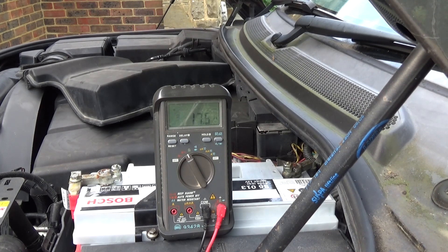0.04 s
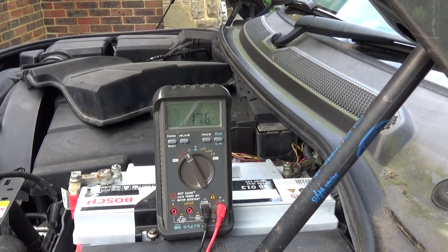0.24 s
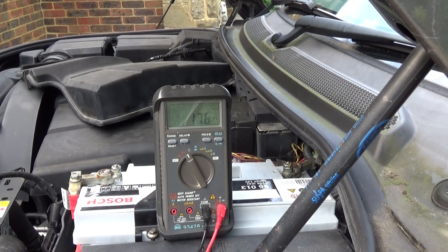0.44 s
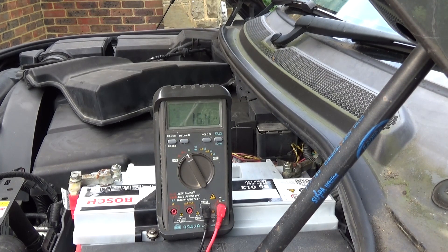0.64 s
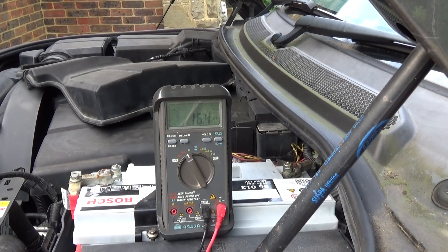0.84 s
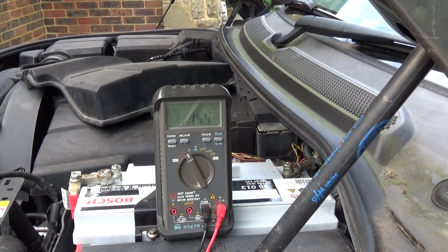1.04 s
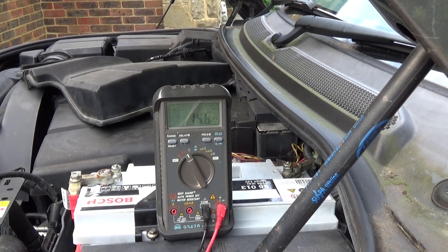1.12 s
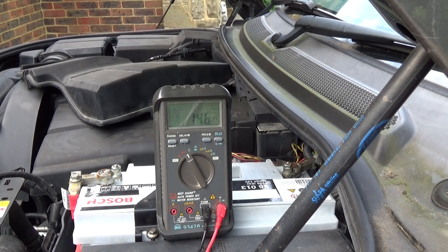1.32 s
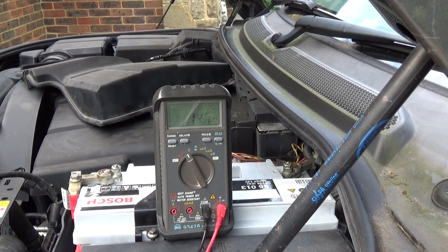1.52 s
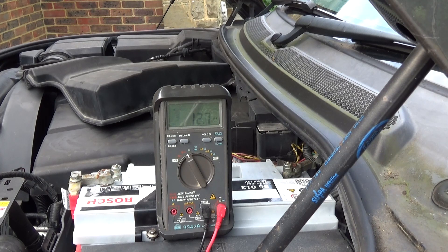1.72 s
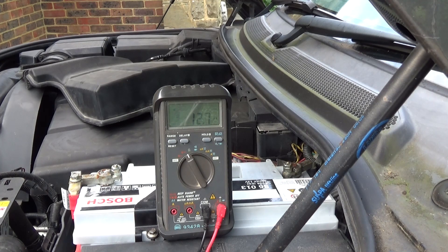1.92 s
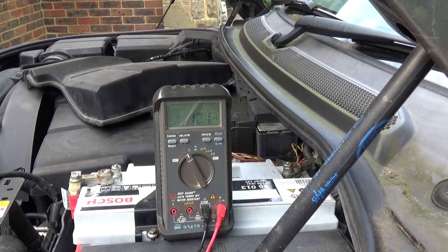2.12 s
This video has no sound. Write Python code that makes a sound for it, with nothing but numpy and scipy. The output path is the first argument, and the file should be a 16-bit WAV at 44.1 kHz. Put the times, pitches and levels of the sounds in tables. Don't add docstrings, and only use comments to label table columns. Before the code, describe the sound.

Close to an open engine bay in a quiet yard, a soft click starts a fast, bright, buzzing metal clatter from a failing starter; it cuts off sharply, leaving short reverberation, two groups of relay ticks and faint traffic hum.

```python
import sys
import numpy as np
from scipy import signal
from scipy.fft import rfft, irfft, next_fast_len
from scipy.io import wavfile
from scipy.ndimage import map_coordinates

SR = 44100
rng = np.random.default_rng(int(sys.argv[2]) if len(sys.argv) > 2 else 0)


def volts_from_db(level):
    exponent = np.asarray(level, float) / 20
    return 10 ** exponent


def master_out(mix):
    frames = np.transpose(np.atleast_2d(mix))
    ceiling = np.clip(frames, -1, 1)
    pcm = np.round(ceiling * 32767).astype(np.int16)
    wavfile.write(sys.argv[1], SR, pcm)


N = 94815


def unit(x):
    return x / np.sqrt(np.mean(x ** 2) + 1e-20)


def along(points, hz):
    point_hz, value = np.transpose(points)
    return np.interp(np.log(hz + 1), np.log(point_hz + 1), value)


def filtered(x, response):
    size = next_fast_len(N + SR // 2)
    hz = np.fft.rfftfreq(size, 1 / SR)
    return irfft(rfft(x, size) * response(hz), size)[..., :N]


def causal(gain):
    rms = np.sqrt(np.mean(gain ** 2))
    cepstrum = irfft(np.log(gain / rms + 1e-5))
    half = len(cepstrum) // 2
    cepstrum[1:half] *= 2
    cepstrum[half + 1:] = 0
    return np.exp(rfft(cepstrum))


def add(x, start_s, piece):
    part = x[..., max(round(start_s * SR), 0):][..., :piece.shape[-1]]
    part += piece[..., :part.shape[-1]]


def sine(hz, t):
    return np.sin(2 * np.pi * hz * t)


def swell_in(t, rise_s):
    return 1 - np.exp(-t / rise_s)


# pitch_hz, level_db
HUM = [(25, -20), (45, 0), (70, -11), (260, -6), (600, -12), (1400, -20), (3000, -29), (16000, -40)]


def hum():
    hum_db, swell_db, swell_hz = -48.5, 1.5, 14
    swell = map_coordinates(rng.standard_normal(40), [np.arange(N) * swell_hz / SR])
    noise = filtered(rng.standard_normal((2, N)), lambda hz: volts_from_db(along(HUM, hz)))
    return volts_from_db(hum_db + swell_db * swell) * unit(noise)


def space(x, decay, gap_s):
    hz, t, z = signal.stft(rng.standard_normal((2, SR // 2)), SR, nperseg=256)
    fade = volts_from_db(-60 * t / along(decay, hz)[:, None])
    tail = signal.istft(z * fade, SR, nperseg=256)[1]
    late = np.pad(x, (round(gap_s * SR), 0))[None]
    return signal.fftconvolve(late, tail / np.linalg.norm(tail[0]), axes=1)[:, :N]


# start_s, level_db, pitch_hz, rattle_s
RELAYS = [
    (.0835, -33, 2200, .005),
    (2.0405, -31, 3500, .003),
    (2.0600, -38, 10000, .003),
    (2.0620, -33, 2250, .002),
    (2.1228, -31, 3800, .005),
    (2.1245, -36, 1750, .004),
    (2.1310, -45, 10000, .007),
]
# pitch_hz, level_db
RELAY_BOX = [(400, -20), (1200, 0), (5000, -1), (7000, -9), (10000, 1), (13000, -3), (16000, -20)]
# start_s, pitch_hz, level_db, t60_s
KNOCKS = [
    (.040, 1400, -42, .07),
    (.044, 620, -45, .06),
    (2.046, 380, -37, .05),
    (2.128, 430, -28, .045),
    (2.133, 300, -34, .05),
]


def relays():
    width_share, broad_db, tail_t60_s = .17, -15, .018
    t, out = np.arange(SR // 20) / SR, np.zeros(N)
    for start_s, level_db, pitch_hz, rattle_s in RELAYS:
        tick, width_hz = np.zeros(N), width_share * pitch_hz
        fade_db = -60 * np.clip(t - rattle_s, 0, 1) / tail_t60_s - 4 * t / rattle_s
        add(tick, start_s, volts_from_db(level_db + fade_db) * rng.standard_normal(len(t)))

        def box(hz):
            peak = width_hz / np.hypot(width_hz, 2 * (hz - pitch_hz))
            return causal(volts_from_db(along(RELAY_BOX, hz)) * (volts_from_db(broad_db) + peak))

        out += filtered(tick, box)
    for start_s, pitch_hz, level_db, t60_s in KNOCKS:
        add(out, start_s, volts_from_db(level_db - 60 * t / t60_s) * sine(pitch_hz, t) * swell_in(t, .002))
    return out


# start_s, thud_db, panel_hz, clatter_db
SEATS = [(0.114, -34.0, 237, -20.9), (0.177, -38.2, 754, -20.2), (0.23, -32.2, 291, -17.5),
         (0.288, -30.2, 231, -19.8), (0.347, -32.3, 517, -21.3), (0.408, -33.4, 646, -20.8),
         (0.467, -29.4, 495, -21.2), (0.529, -30.4, 484, -19.0), (0.591, -33.1, 490, -19.1),
         (0.651, -35.5, 791, -20.3), (0.713, -33.3, 484, -20.9), (0.776, -31.8, 275, -21.4),
         (0.84, -33.0, 867, -20.5), (0.902, -35.3, 807, -20.8), (0.967, -32.8, 592, -18.8),
         (1.03, -32.0, 829, -18.3), (1.093, -33.1, 802, -20.8), (1.157, -32.8, 484, -20.1),
         (1.223, -34.3, 807, -18.4), (1.287, -34.6, 802, -19.7), (1.353, -34.1, 867, -18.6),
         (1.419, -33.6, 834, -15.0), (1.484, -33.3, 807, -17.4), (1.546, -34.0, 818, -19.0),
         (1.614, -33.1, 829, -18.7), (1.68, -33.6, 807, -18.6), (1.745, -33.0, 834, -18.0),
         (1.815, -35.1, 818, -18.2), (1.881, -35.7, 700, -17.6)]
# pitch_hz, level_db, t60_s
BLOCK = [(122, -36, .13), (155, -37, .11), (240, -43, .10), (495, -40, .1)]


def thud():
    follow, panel_db, panel_t60_s = .7, 3, .08
    t, x = np.arange(SR // 4) / SR, np.zeros(N)
    usual_db = np.mean(SEATS, axis=0)[1]
    for start_s, thud_db, panel_hz, _ in SEATS:
        ring = np.zeros(len(t))
        for (pitch_hz, level_db, t60_s), r in zip(BLOCK, rng.standard_normal(len(BLOCK))):
            ring += volts_from_db(level_db + 2.5 * r - 60 * t / t60_s) * sine(pitch_hz * (1 + .045 * r), t)
        add(x, start_s, volts_from_db(follow * (thud_db - usual_db)) * ring * swell_in(t, .004))
        panel = volts_from_db(thud_db + panel_db - 60 * t / panel_t60_s) * sine(panel_hz, t)
        add(x, start_s, panel * swell_in(t, .005))
    return x


# start_s, level_db, loudest_hz
BLOWS = [(0.107, -11.2, 3400.0), (0.1614, -13.6, 4950.0), (0.1663, -12.1, 12340.0), (0.2195, -11.9, 9800.0),
         (0.2419, -14.2, 2070.0), (0.2742, -12.5, 3570.0), (0.2788, -11.2, 3450.0), (0.2921, -14.8, 2150.0),
         (0.3953, -11.8, 3660.0), (0.5167, -12.1, 3680.0), (0.5779, -11.8, 3660.0), (0.638, -12.3, 9860.0),
         (0.6449, -12.8, 4460.0), (0.7009, -12.0, 3660.0), (0.7623, -12.2, 3600.0), (0.77, -12.7, 3620.0),
         (0.8276, -12.3, 3660.0), (0.8908, -12.4, 9800.0), (0.9533, -12.3, 3600.0), (1.0163, -13.5, 3620.0),
         (1.0323, -13.2, 3730.0), (1.0804, -12.0, 9820.0), (1.1448, -12.3, 3600.0), (1.1746, -15.9, 3700.0),
         (1.2072, -13.0, 4370.0), (1.2402, -15.4, 3770.0), (1.2738, -12.7, 3620.0), (1.3405, -11.5, 9820.0),
         (1.4044, -11.6, 3620.0), (1.4203, -10.0, 2090.0), (1.4694, -12.7, 9820.0), (1.4774, -12.9, 3640.0),
         (1.4843, -13.0, 2090.0), (1.5346, -12.1, 3600.0), (1.5419, -12.9, 3640.0), (1.5654, -15.2, 1720.0),
         (1.6003, -11.9, 9820.0), (1.6661, -12.3, 3620.0), (1.7323, -11.8, 3620.0), (1.7498, -13.6, 3620.0),
         (1.8013, -11.9, 3600.0), (1.8688, -10.9, 3640.0)]
# pitch_hz, level_db
TOOTH = [(3620, -7), (4400, -9), (8050, -13), (9820, -8)]


def blows():
    blow_db, ring_t60_s, crack_db, crack_t60_s, rise_s = -3.5, .021, -7, .012, .0006
    t, x = np.arange(SR // 20) / SR, np.zeros(N)
    for start_s, level_db, loudest_hz in BLOWS:
        ring = sine(loudest_hz, t)
        for (pitch_hz, mode_db), r in zip(TOOTH, rng.standard_normal(len(TOOTH))):
            phase = 2 * np.pi * (pitch_hz * (1 + .01 * r) * t + r)
            ring += volts_from_db(mode_db + 3 * r) * np.sin(phase)
        crack = volts_from_db(crack_db - 60 * t / crack_t60_s) * rng.standard_normal(len(t))
        blow = volts_from_db(-60 * t / ring_t60_s) * ring + crack
        add(x, start_s - rise_s, volts_from_db(level_db + blow_db) * blow * swell_in(t, rise_s))
    return filtered(x, lambda hz: causal(hz ** 2 / (hz ** 2 + 1200 ** 2)))


# pitch_hz, width_hz, lift_db
METAL_MODES = [(1022, 26, 9), (1207, 25, 4), (1630, 16, 10), (1806, 14, 8), (1969, 22, 5), (2010, 25, 5),
               (2121, 27, 8.5), (3330, 30, 5), (3620, 40, 6), (3735, 25, 4), (3813, 22, 6), (4200, 25, 6),
               (4369, 18, 7),
               (812, 24, 7), (4605, 27, 4), (4960, 30, 4), (8005, 120, 4), (9695, 90, 5), (12400, 120, 2.5)]


def metal(colour):
    def response(hz):
        power = 1
        for mode_hz, width_hz, lift_db in METAL_MODES:
            power = power + volts_from_db(2 * lift_db) * width_hz ** 2 / (width_hz ** 2 + 4 * (hz - mode_hz) ** 2)
        return causal(volts_from_db(along(colour, hz)) * np.sqrt(power))
    return response


def tinted(noise, spot_hz):
    patch_db, patch_hz, spot_db, spot_width_hz = 1.6, 700, 3.5, 1100
    hz = np.fft.rfftfreq(noise.shape[-1], 1 / SR)
    knots = rng.standard_normal((len(noise), int(SR / 2 / patch_hz) + 2))
    patch = np.array([np.interp(hz / patch_hz, np.arange(len(k)), k) for k in knots])
    spot = np.exp(-((hz - spot_hz[:, None]) / spot_width_hz) ** 2)
    gain = volts_from_db(patch_db * patch + spot_db * spot)
    return unit(irfft(rfft(noise) * gain[:, None], noise.shape[-1]))


# start_s, peak_db, clang_db, brightest_hz
STROKES = [(0.0985, -7, -20, 8100), (0.16, -7, -28, 12400), (0.2134, -6, -23, 9940),
           (0.2713, -7, -17, 7840), (0.3301, -7, -19, 12400), (0.3905, -6, -20, 8260),
           (0.4499, -6, -20, 7950), (0.5117, -7, -19, 12400), (0.5736, -6, -20, 9700),
           (0.6345, -5, -24, 9690), (0.6963, -6, -21, 9690), (0.7587, -5, -18, 8450),
           (0.823, -7, -18, 8140), (0.8846, -8, -23, 9700), (0.9497, -7, -21, 9690),
           (1.0126, -8, -23, 9690), (1.0765, -6, -22, 9860), (1.1403, -7, -21, 9700),
           (1.2062, -7, -21, 9690), (1.2705, -6, -21, 9860), (1.3359, -6, -23, 9910),
           (1.4017, -5, -20, 9860), (1.4666, -6, -22, 9690), (1.5292, -6, -21, 9690),
           (1.5973, -6, -22, 9690), (1.6626, -7, -21, 9700), (1.7285, -6, -21, 10600),
           (1.7978, -7, -22, 9910), (1.8642, -4, -20, 9910)]


def stage(timing, colour, strength_db):
    jitter_s, grit_db = .0005, 2.1
    delay_s, rise_s, hold_s, t60_s, level_db, share, scatter_db = timing
    t, x = np.arange(SR // 10) / SR, np.zeros((2, N))
    fade = volts_from_db(-60 * np.clip(t - rise_s - hold_s, 0, 1) / t60_s)
    shape = np.clip(t / rise_s, 0, 1) ** 1.5 * fade
    count = len(STROKES)
    impact_db = grit_db * rng.standard_normal((count + 1, 1, len(t)))
    grit = rng.standard_normal((count + 1, 2, len(t))) * volts_from_db(impact_db)
    starts_s, _, _, spot_hz = np.transpose(STROKES)
    bursts = tinted(np.sqrt(share) * grit[0] + np.sqrt(1 - share) * grit[1:], spot_hz)
    for start_s, db, burst in zip(starts_s, strength_db, bursts):
        late, loud = rng.standard_normal(2)
        gain = volts_from_db(db + level_db + scatter_db * loud)
        add(x, start_s + delay_s + jitter_s * late, gain * shape * burst)
    return filtered(x, metal(colour))


# delay_s, rise_s, hold_s, t60_s, level_db, repeating_share, scatter_db
THROW = (-.0025, .0045, .010, .07, -20, .15, .7)
CLANG = (-.002, .004, .008, .045, -24, .25, .6)
ZING = (-.0025, .0045, .010, .09, -25, .3, .6)
SEAT = (.017, .0015, .011, .09, -22, .15, .7)
SNAP = (.033, .0007, .001, .03, -23, .2, 1.2)
FALL = (.042, .002, .005, .07, -29, .3, 2.5)
# pitch_hz, level_db
BRIGHT = [(90, -40), (250, -14), (1900, -6), (2900, -8), (5400, -4.5), (6800, -12), (12700, -8),
          (16000, -19)]
RING_GEAR = [(2000, -32), (2900, -11), (3250, -1), (3650, 0), (4000, -4), (4500, -3), (5200, -17),
             (9000, -36)]
TEETH = [(4000, -30), (7000, -12), (8100, -1), (8900, -5), (9900, -3), (11300, -6), (12600, -3),
         (15800, -18)]
DULL = [(90, -33), (220, -9), (2060, -2.5), (2800, -6), (5000, -4), (6770, -11), (11500, -8.5),
        (16000, -21)]
SNAPPY = [(300, -22), (2000, -8), (3700, 0), (6000, -12), (10000, -12), (16000, -22)]
LATE = [(90, -30), (200, -5), (1630, -2), (2600, -6), (4000, -4), (6140, -12), (12200, -11), (16000, -26)]


def starter():
    push_follow, clang_grows, seat_follow = .2, 1.2, .55
    _, peak_db, clang_db, _ = (column - np.mean(column) for column in np.transpose(STROKES))
    clatter_db = np.transpose(SEATS)[3]
    push_db = push_follow * peak_db
    seat_db = seat_follow * (clatter_db - clatter_db.mean())
    x = stage(THROW, BRIGHT, push_db)
    x += stage(CLANG, RING_GEAR, clang_grows * clang_db)
    x += stage(ZING, TEETH, push_db)
    x += stage(SEAT, DULL, seat_db)
    x += stage(SNAP, SNAPPY, push_db)
    x += stage(FALL, LATE, push_db)
    return x


# pitch_hz, t60_s
BAY = [(150, .2), (1000, .14), (12000, .12)]
YARD = [(150, .5), (1000, .75), (12000, .6)]
# pitch_hz, level_db
APART = [(60, -22), (250, -21), (450, -21), (750, -12), (2400, -14), (5500, -7.5), (9000, -12),
         (15000, -24)]
# pitch_hz, level_db
TILT = [(60, .3), (200, .6), (700, 2.4), (1290, 2.4), (2600, 1.1), (5000, 1.8), (8500, -.1)]


def scene():
    bay_db, yard_db, relay_wet, scattered = -8.5, -19, .5, .75
    facing, other = starter()
    ticks = relays()
    car = facing + thud() + blows() + ticks
    heard = car - (1 - relay_wet) * ticks
    around = volts_from_db(bay_db) * space(heard, BAY, .002) + volts_from_db(yard_db) * space(heard, YARD, .02) + hum()
    near = space(car, [(150, .05), (12000, .03)], .0003)[0]
    mid = car + around[0]
    side = np.sqrt(1 - scattered) * near + np.sqrt(scattered) * other + around[1]
    side = filtered(side, lambda hz: volts_from_db(along(APART, hz)))
    left_right = np.array([mid + side, mid - side])
    return filtered(left_right, lambda hz: volts_from_db(along(TILT, hz) / 2 * np.array([[1], [-1]])))


def low_pass(x):
    return signal.sosfilt(signal.butter(12, 16450, fs=SR, output="sos"), x)


def record(dry):
    mix = filtered(dry, lambda hz: hz < 15860)
    return low_pass(mix)


dry = scene()
out = record(dry)
master_out(out)
```